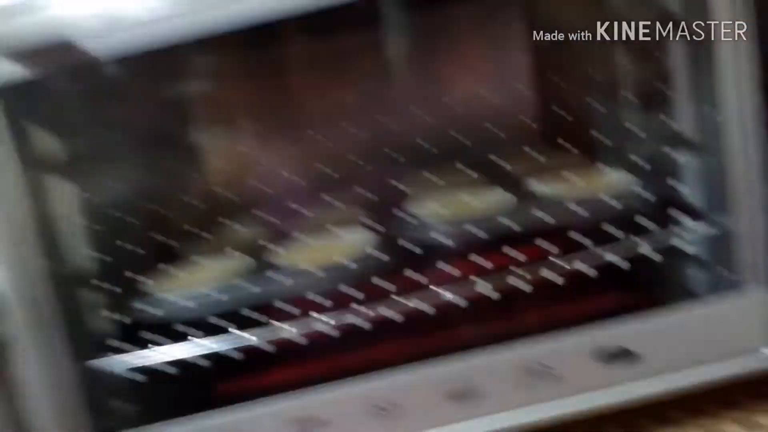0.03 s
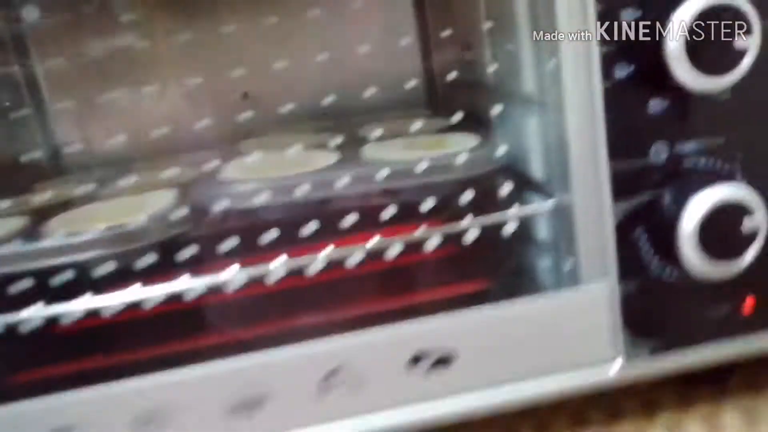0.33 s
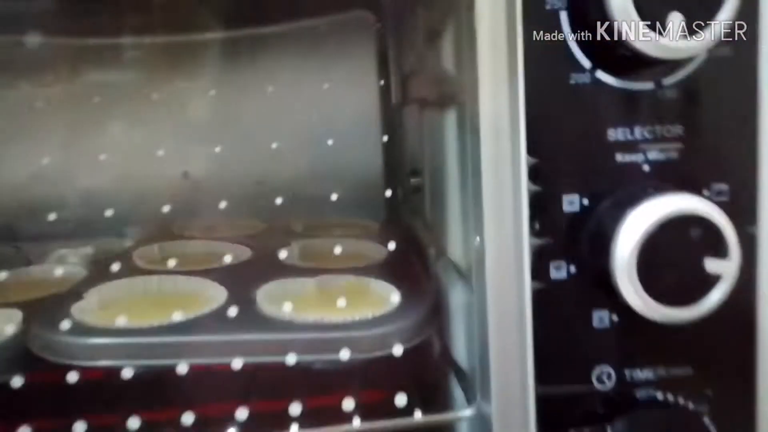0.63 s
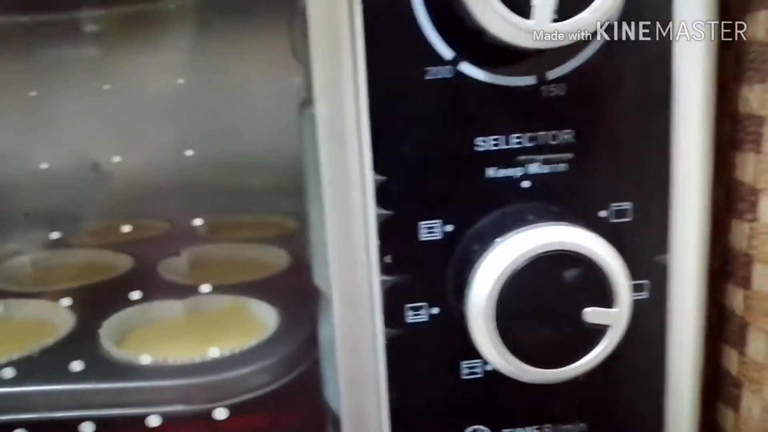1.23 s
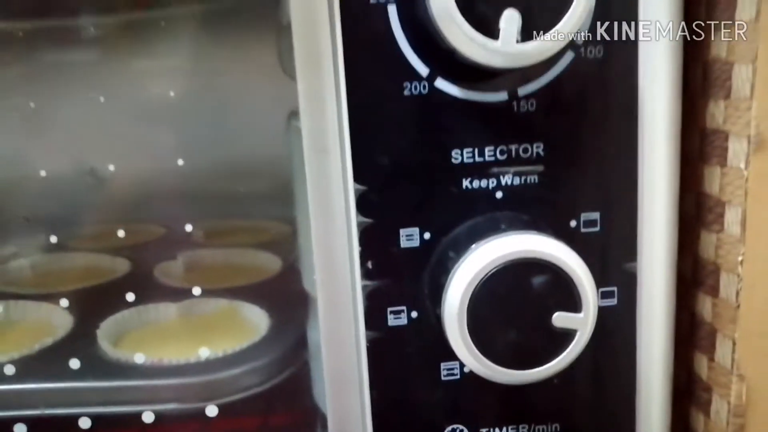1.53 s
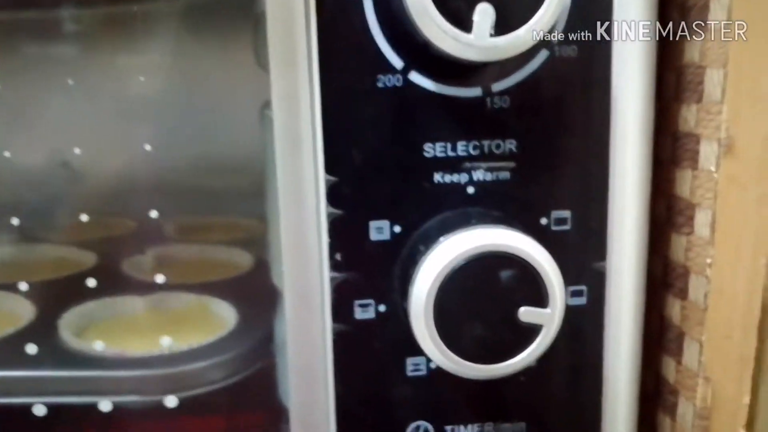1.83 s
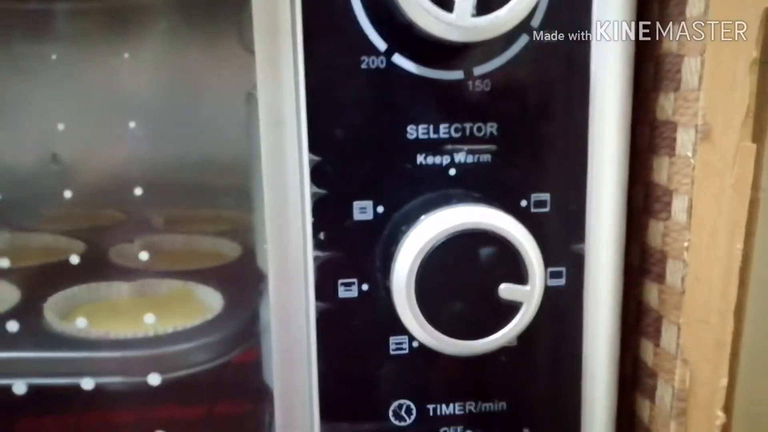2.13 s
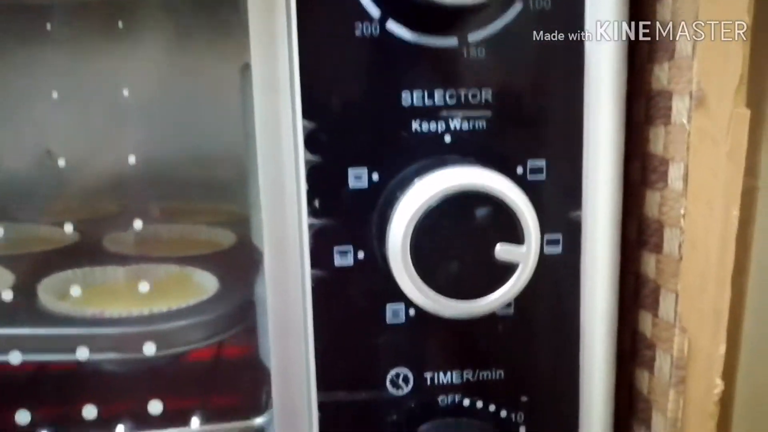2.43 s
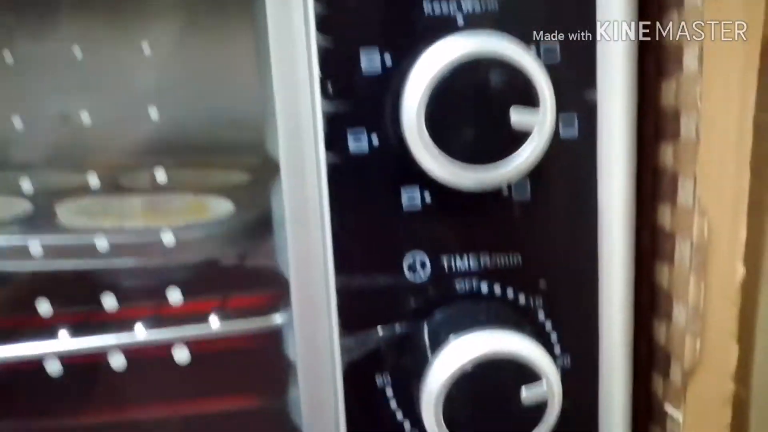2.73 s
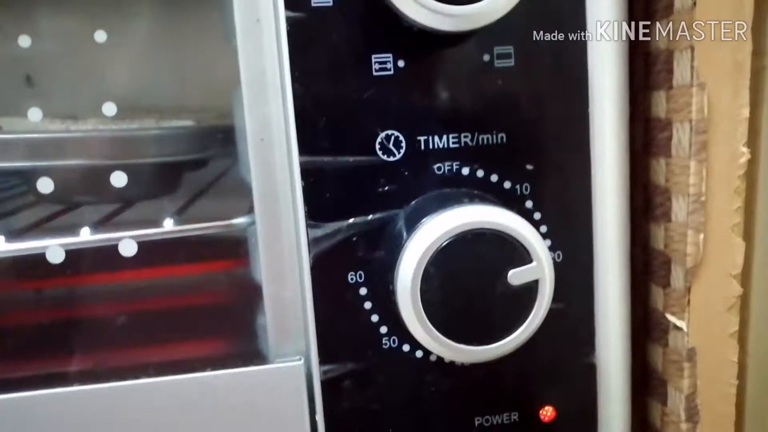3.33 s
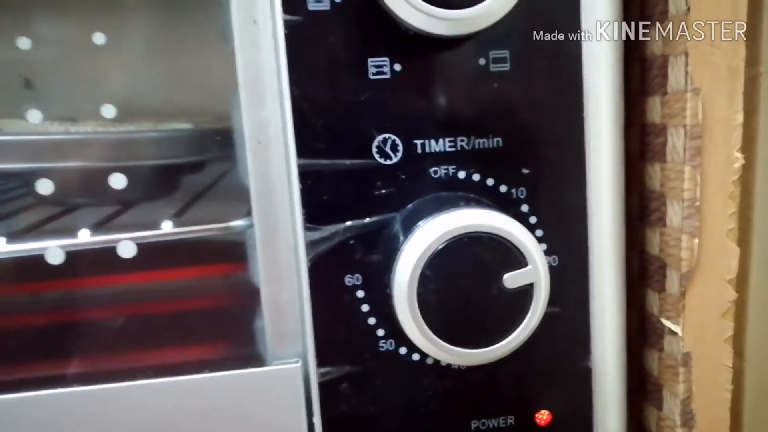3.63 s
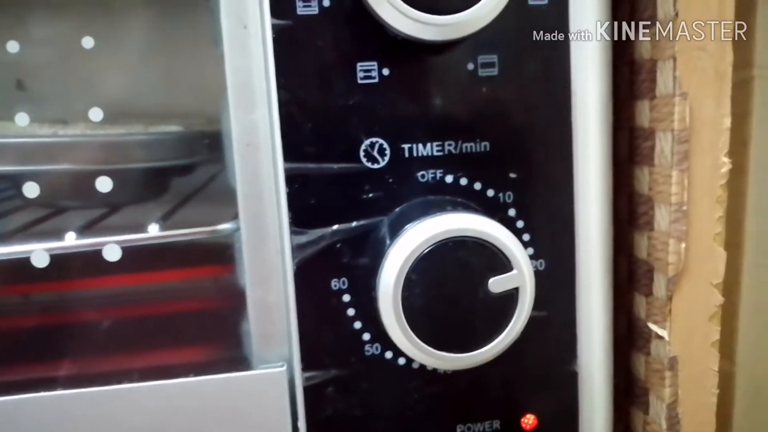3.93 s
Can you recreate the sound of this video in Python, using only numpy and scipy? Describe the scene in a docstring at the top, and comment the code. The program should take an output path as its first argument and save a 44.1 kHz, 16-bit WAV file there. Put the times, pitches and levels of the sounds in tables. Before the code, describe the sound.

A small oven's clockwork timer ticks close to a hand-held microphone in a kitchen. A hand rustles briefly at first, then the even, slightly ringing tick-tock runs on over a faint motor hum and room noise.

```python
"""Oven timer ticking in a kitchen

A small oven's clockwork timer goes tick-tock near a hand-held phone: two pallets strike in turn
and ring the housing. A motor hums and buzzes faintly over room noise, its tones shifting in level
as the phone moves. The hand rustles on the phone at first, then gives a few soft rubs and clicks."""
import sys
import numpy as np
from scipy import signal
from scipy.fft import rfft, irfft
from scipy.io import wavfile

SR = 44100
rng = np.random.default_rng(int(sys.argv[2]) if len(sys.argv) > 2 else 0)


def wav_out(sig):
    """Save sig, one row per channel (or a flat mono array), as 16-bit PCM at SR to the path in sys.argv[1]."""
    wavfile.write(sys.argv[1], SR, np.round(np.clip(np.atleast_2d(sig).T, -1, 1) * 32767).astype(np.int16))


N = 176400
T = np.arange(N) / SR
HZ = np.arange(N // 2 + 1) * SR / N
BEAT_T = T[:N // 10]
SIDES = np.array([[1], [-1]])  # left, right


def undb(db):
    """Decibels to gain."""
    return 10 ** (np.asarray(db) / 20)


def unit(x):
    """Scale to rms 1."""
    return x / np.sqrt(np.mean(x ** 2))


def pan(pan_db):
    """Stereo gains; pan_db is left minus right."""
    return undb(SIDES * pan_db / 2)


def spectrum(table, column=1):
    """Table column interpolated over log frequency."""
    rows = np.array(table, float)
    return np.interp(np.log(HZ + 1), np.log(rows[:, 0]), rows[:, column])


def curve(table, column=1):
    """Table column interpolated over time."""
    rows = np.array(table, float)
    return np.interp(T, rows[:, 0], rows[:, column])


def colour(x, gain_db):
    """Minimum-phase filter with a gain per frequency."""
    cepstrum = irfft(np.log(undb(gain_db)), N)
    cepstrum[..., 1:N // 2] *= 2
    cepstrum[..., N // 2 + 1:] = 0
    impulse = np.atleast_2d(irfft(np.exp(rfft(cepstrum)), N))
    return signal.fftconvolve(x, impulse[:, :N // 40], axes=-1)[:, :N]


def lift(x, band_filter, gain_db):
    """Boost or cut one band."""
    return x + (undb(gain_db) - 1) * signal.lfilter(*band_filter, x)


def noise_band(centre_hz, width_hz):
    """Steep-sided stereo noise band, rms 1."""
    rolloff = np.sqrt(1 + ((HZ - centre_hz) / (width_hz / 2)) ** 4)
    return unit(irfft(rfft(rng.standard_normal((2, N))) / rolloff, N))


def walk(rate_hz):
    """Smooth random motion, rms 1."""
    return unit(irfft(rfft(rng.standard_normal(N)) / (1 + (HZ / rate_hz) ** 4), N))


def decay(start_s, t60_s):
    """Exponential decay, silent before start_s."""
    return (T >= start_s) * np.exp(-np.log(1000) * np.abs(T - start_s) / t60_s)


def tone(pitch_hz, waver, rate_hz):
    """Tone of rms 1; waver (0-1) unsettles amplitude and phase."""
    phasor = np.sqrt(2 * (1 - waver ** 2)) + waver * (walk(rate_hz) + 1j * walk(rate_hz))
    return unit(np.real(phasor * np.exp(2j * np.pi * (pitch_hz * T + rng.random()))))


def add(out, x, start_s):
    """Mix x into out at start_s."""
    i = int(start_s * SR)
    out[:, i:i + x.shape[1]] += x[:, :N - i]


def air():
    """Steady room noise, alike in both channels in the bass."""
    # freq_hz, level_db
    noise_floor = [(20, -53), (50, -31), (90, -38.5), (170, -41.5), (240, -44), (300, -37), (400, -46.5),
                   (560, -50.5), (700, -56.5), (1000, -57), (1600, -62), (2200, -62), (2650, -55),
                   (3200, -64), (4000, -72), (5200, -62.5), (6500, -71), (7800, -74.5), (9500, -71),
                   (12600, -75), (15000, -74)]
    alike_below_hz = 352
    mid, side = rfft(rng.standard_normal((2, N)))
    coherence = 1 / (1 + (HZ / alike_below_hz) ** 2)
    stereo = mid * np.sqrt((1 + coherence) / 2) + SIDES * side * np.sqrt((1 - coherence) / 2)
    return irfft(stereo * undb(spectrum(noise_floor)), N)


def motor():
    """Shaft-rate hum, wavering tones and a panel buzzing at shaft harmonics; all shift with the phone."""
    # time_s, level_db, pan_db
    hum_path = [(0.05, -47, -2.5), (0.44, -44, -0.5), (0.71, -49, -2.0), (1.7, -44, 0.5), (2.28, -53, 3.5),
                (2.31, -50, 6), (2.86, -44.5, 3), (3.04, -46, 1.5), (3.37, -53.5, 4), (3.76, -45.5, 2.5),
                (3.86, -44.5, 3.0), (3.95, -45.5, 0.5)]
    # pitch_hz: level_db, pan_db, waver
    weak_tones = {120: (-63, -10.5, 0.51), 131: (-66, -2.7, .8), 143: (-72, 5.3, 0.99), 190: (-59, 0, 0.38),
                  215: (-73.5, 12, 0.43), 294: (-72.5, 0, 0.82), 312: (-71, 10.7, 0.73),
                  360: (-68, 1, 0.41), 408: (-71.5, -8.5, 0.46), 571: (-77.5, 10.6, 0.46)}
    # time_s, gain_db
    tones_path = [(0, -0.5), (.45, -3.5), (.7, 0.5), (1.4, 2), (2, 0.5), (2.6, -1.5), (3.3, -1.5), (4, 0)]
    # harmonic: level_db
    buzz_harmonics = {41: -82, 42: -75.5, 43: -77, 44: -89, 45: -76.5, 46: -76, 47: -75, 48: -87, 49: -84,
                      152: -86.5, 153: -92.5}
    # time_s, gain_db, pan_db
    buzz_path = [(0, 0.5, -5), (.5, 1, 1), (.8, 1.5, -8), (1.2, 0.5, -3.5), (1.8, -2.5, 4.5),
                 (2.4, -0.5, 8), (2.8, 0.5, 2), (3.2, 1, -11.5), (3.5, 1.5, -3.5), (4, -1, -5)]
    shaft_hz, left_lag_s = 58.19, .0003
    hum = np.sqrt(2) * np.sin(2 * np.pi * shaft_hz * np.array([T - left_lag_s, T]))
    hum *= undb(curve(hum_path)) * pan(curve(hum_path, column=2))
    tones = sum(undb(level_db) * pan(pan_db) * tone(pitch_hz, waver, rate_hz=5.05)
                for pitch_hz, (level_db, pan_db, waver) in weak_tones.items())
    tones *= undb(curve(tones_path))
    buzz = np.zeros((2, N))
    for harmonic, level_db in buzz_harmonics.items():
        for channel in buzz:
            channel += undb(level_db) * tone(harmonic * shaft_hz, waver=.64, rate_hz=3.1)
    buzz *= undb(curve(buzz_path)) * pan(curve(buzz_path, column=2))
    return hum + tones + buzz


def hand():
    """Hand sliding on the phone: grainy rustle, soft resonant rubs, small clicks of the grip."""
    # time_s, gain_db
    rustle_path = [(0, -6.5), (.055, 0.5), (.07, 5), (.13, -0.5), (.17, -2), (.22, 1.5), (.28, 0.5),
                   (.30, 5.5), (.32, 0), (.355, -0.5), (.39, -13), (.5, -19), (.62, -21), (.72, -19),
                   (.8, -21), (.88, -24), (1, -59), (4, -72)]
    # freq_hz, level_db, pan_db
    rustle_colour = [(400, -56, -3), (1100, -58.5, 4), (1700, -57.5, -8), (2220, -49.5, -7.5),
                     (3530, -56, -9.5), (5140, -54.5, -4), (6160, -51, -9), (8200, -58.5, -5.5),
                     (10000, -59, 1.5), (15000, -58, -7)]
    # middle_s, length_s, centre_hz, width_hz, level_db, pan_db
    rubs = [(.005, 0.018, 1650, 400, -55.5, -9.5), (0.075, 0.12, 1300, 500, -66, -8.5),
            (0.196, 0.08, 332, 70, -58, 5), (0.25, 0.064, 2250, 130, -63.5, -9),
            (0.402, 0.066, 2300, 500, -64.5, -9.5), (0.47, 0.04, 2100, 170, -59.5, -8),
            (.46, 0.048, 1660, 710, -66, -1), (.70, 0.14, 2400, 400, -67, -10),
            (0.734, 0.14, 4500, 1100, -67.5, -5), (0.744, 0.45, 950, 600, -67, 1),
            (.805, 0.059, 2280, 220, -59, -14), (0.857, 0.14, 2040, 240, -61.5, -12.5),
            (.81, 0.13, 2660, 1190, -67.5, -11), (1.462, 0.026, 1630, 200, -63, -14),
            (2.465, 0.036, 1700, 1300, -62, -4), (3.475, 0.046, 1980, 900, -60, -8),
            (3.465, 0.032, 5450, 1510, -66.5, -3)]
    # start_s, centre_hz, width_hz, level_db, t60_s
    clicks = [(1.1468, 2820, 597, -51.5, 0.034), (1.320, 2580, 1000, -54.5, 0.046),
              (2.973, 10000, 1800, -60, 0.013)]
    noise = rng.standard_normal((2, N))
    grain_db = walk(rate_hz=250)
    grains = noise * undb(curve(rustle_path) + grain_db)
    out = colour(grains, spectrum(rustle_colour) + SIDES / 2 * spectrum(rustle_colour, column=2))
    for middle_s, length_s, centre_hz, width_hz, level_db, pan_db in rubs:
        swell = np.exp(-2 * ((T - middle_s) / length_s) ** 2)
        out += noise_band(centre_hz, width_hz) * undb(level_db) * pan(pan_db) * swell
    for start_s, centre_hz, width_hz, level_db, t60_s in clicks:
        out += noise_band(centre_hz, width_hz) * undb(level_db) * pan(-.5) * decay(start_s, t60_s)
    return out


def housing_ring():
    """Clear modes of the timer housing, struck a little differently by each beat."""
    # pitch_hz, level_db, t60_s, pan_db
    modes = [(1291, -66, 0.16, -3.5), (3200, -68, 0.26, -2), (3870, -77, 0.3, -8), (4650, -65, 0.14, -9),
             (5150, -65.5, 0.1, -12.5), (5550, -71, 0.18, 9), (6060, -69, 0.11, -3), (6430, -65.5, 0.11, 3),
             (9940, -70.5, 0.051, 15)]
    scatter_db, detune = 3.5, .0081
    out = np.zeros((2, len(BEAT_T)))
    draws = rng.standard_normal((len(modes), 3, 1))
    for (pitch_hz, level_db, t60_s, pan_db), draw in zip(modes, draws):
        gain = undb(level_db + scatter_db * draw[:2]) * pan(pan_db)
        cycles = pitch_hz * (1 + detune * draw[2]) * BEAT_T + rng.random((2, 1))
        out += gain * np.exp(-np.log(1000) * BEAT_T / t60_s) * np.sin(2 * np.pi * cycles)
    return out


def panel_ring():
    """One panel mode, rung by the tick."""
    pitch_hz, level_db = 2081, -62.5
    ring = np.sin(2 * np.pi * pitch_hz * T) * decay(0, t60_s=.17)
    return undb(level_db) * pan(-14) * ring[:len(BEAT_T)]


def strike_envelopes():
    """Pallet crack with one rebound, and the tail of housing and kitchen; joint energy 1."""
    rise_s, crack_s, rebound_s, rebound_db = .0003, .003, .0092, -9.5
    body_db, room_db = -6.5, -14
    crack = (1 - np.exp(-BEAT_T / rise_s)) * np.exp(-(BEAT_T / crack_s) ** 4 / 2)
    crack += undb(rebound_db) * np.exp(-((BEAT_T - rebound_s) / crack_s) ** 2)
    body = undb(body_db) * decay(0, t60_s=.24)
    room = undb(room_db) * decay(0, t60_s=.41)
    tail = np.hypot(body, room)[:len(BEAT_T)]
    norm = np.sqrt(np.sum(crack ** 2 + tail ** 2))
    return crack / norm, tail / norm


def timer():
    """Escapement: two pallets strike in turn and ring the housing; one unlocks just before each tick."""
    # tick and tock in turn: start_s, level_db, presence_db, pan_db
    beats = [(0.5359, -2, -5, -3), (.7690, -4.5, -3, -4), (1.01, 0.5, 1, 0), (1.2427, -3.5, -1.5, -3),
             (1.4844, 1.5, 0, -2.5), (1.7176, -4.5, -5, -5), (1.9606, 0.5, 3.5, 3.5), (2.192, -4, 3, 1),
             (2.4358, 0, 2, -2.5), (2.6680, -1.5, 2, -1), (2.9120, -0.5, 0.5, -0.5),
             (3.1435, -2.5, 4.5, -2.5), (3.386, 0, 4, -1.5), (3.6183, 0, 3, -1.5), (3.8630, -3, 6.5, -3)]
    # freq_hz, tick_db, tock_db, pan_db
    housing_colour = [(400, -36, -26, -25), (900, -23.5, -31, -6), (1300, -23.5, -25, 6),
                      (1540, -30.5, -32, -6), (2100, -20, -25, -18.5), (2720, -25.5, -27.5, -6),
                      (3260, -21.5, -20.5, 3), (4240, -23, -22.5, 8), (4460, -20.5, -23, -13.5),
                      (5470, -29, -22.5, 4), (6410, -23.5, -27, -17.5), (7670, -27.5, -26, -3),
                      (8200, -37.5, -33.5, 22.5), (8920, -29, -27.5, 1), (9700, -34.5, -24.5, 6),
                      (10600, -33.5, -21, 7.5), (13000, -37, -32, 4), (14800, -33, -32, -1)]
    unlock_lead_s, unlock_db = .014, -12.5
    fresh_share = .77  # noise power renewed on each beat
    presence = signal.butter(1, (4700, 6000), "band", fs=SR)
    treble = signal.butter(1, 10000, "high", fs=SR)
    balance_db = SIDES / 2 * spectrum(housing_colour, column=3)
    crack, tail = strike_envelopes()
    out = np.zeros((2, N))
    for pallet in (0, 1):  # tick, tock
        strikes = np.zeros((2, N))
        repeated = np.sqrt(1 - fresh_share) * rng.standard_normal((2, len(BEAT_T)))
        for start_s, level_db, presence_db, pan_db in beats[pallet::2]:
            gain = undb(level_db) * pan(pan_db)
            noise = repeated + np.sqrt(fresh_share) * rng.standard_normal(repeated.shape)
            dull_noise = lift(noise, treble, gain_db=-4)
            strike = lift(gain * (crack * noise + tail * dull_noise), presence, presence_db)
            add(strikes, strike, start_s)
            add(out, lift(gain * housing_ring(), presence, presence_db), start_s)
            if pallet == 0:
                unlock = undb(unlock_db) * lift(strike, treble, gain_db=-5)
                add(strikes, unlock, start_s - unlock_lead_s)
                add(out, gain * panel_ring(), start_s)
        out += colour(strikes, spectrum(housing_colour, column=1 + pallet) + balance_db)
    return out


def scene():
    """Stereo mix of all sources."""
    return timer() + motor() + air() + hand()


def record(dry):
    """Phone microphones: each port resonates at its own pitch, then a steep low-pass."""
    # left, right: centre_hz, width_hz, peak_db
    ports = [(9360, 950, 11.5), (5660, 500, 10)]
    cutoff_hz = 15400
    power_gain = [1 + (undb(peak_db) ** 2 - 1) / (1 + ((HZ - centre_hz) / (width_hz / 2)) ** 2)
                  for centre_hz, width_hz, peak_db in ports]
    lowpass = signal.ellip(10, .2, 70, cutoff_hz, fs=SR, output="sos")
    return signal.sosfilt(lowpass, colour(dry, 10 * np.log10(power_gain)))


dry = scene()
out = record(dry)
wav_out(out)
```